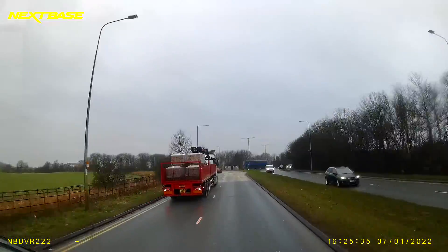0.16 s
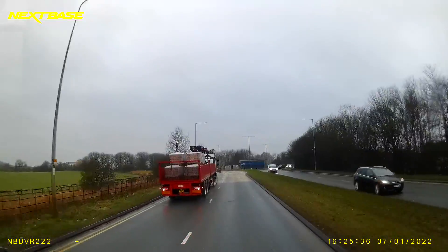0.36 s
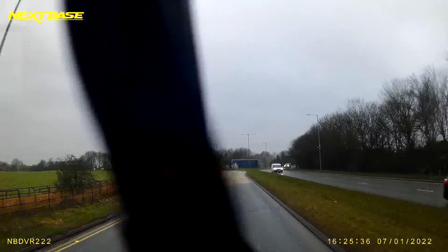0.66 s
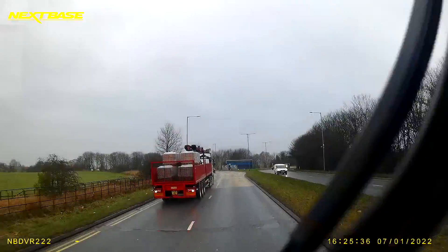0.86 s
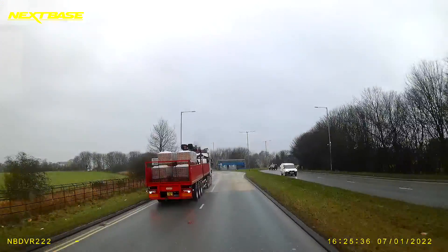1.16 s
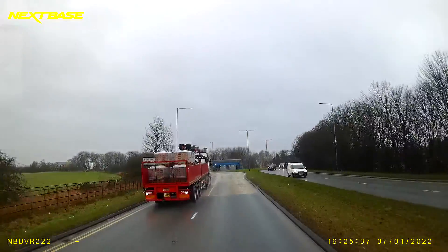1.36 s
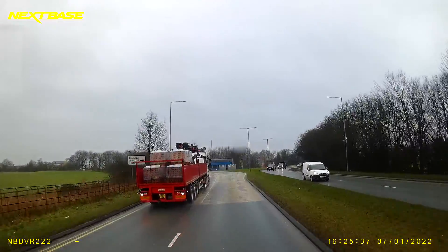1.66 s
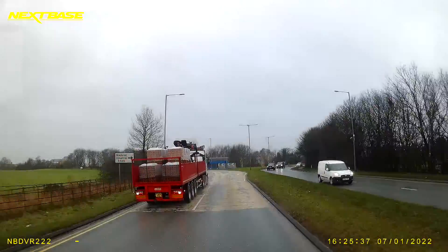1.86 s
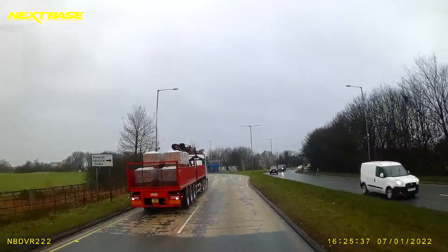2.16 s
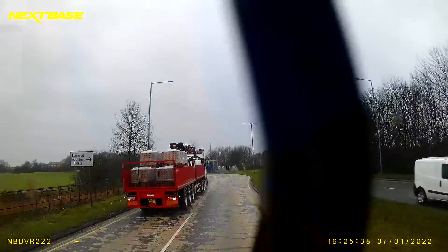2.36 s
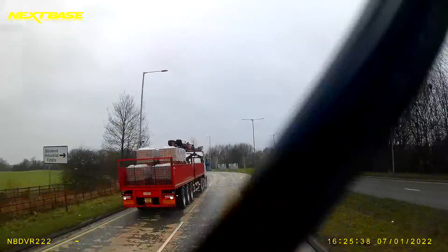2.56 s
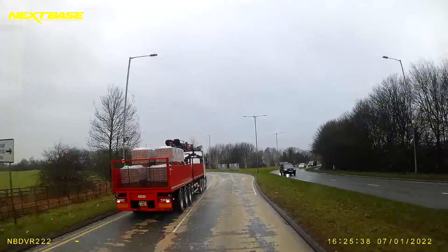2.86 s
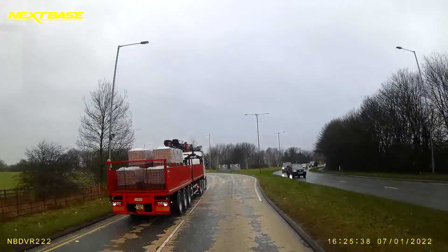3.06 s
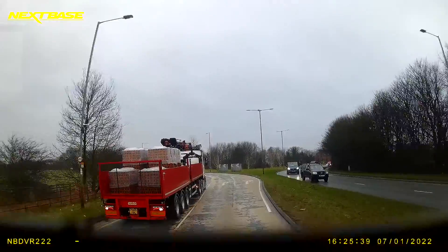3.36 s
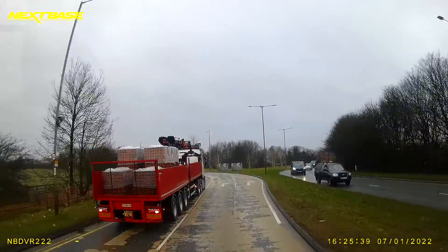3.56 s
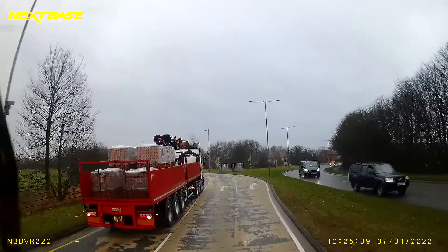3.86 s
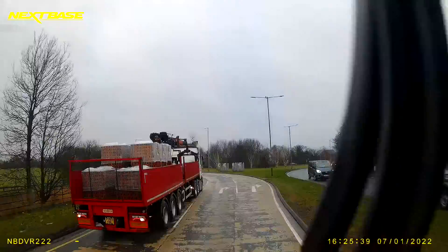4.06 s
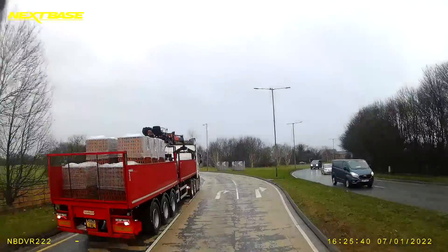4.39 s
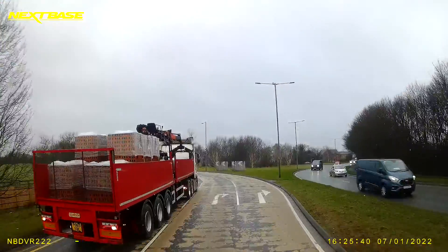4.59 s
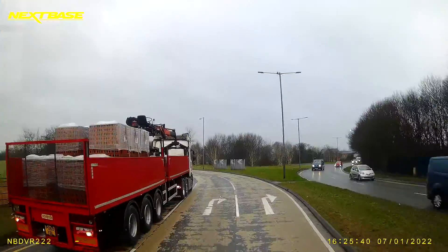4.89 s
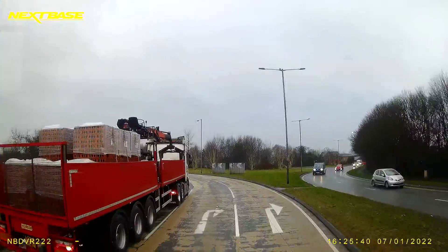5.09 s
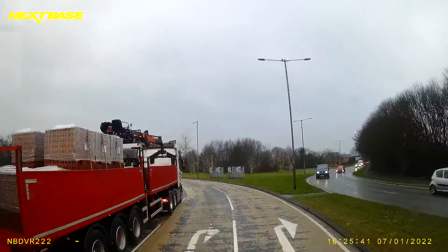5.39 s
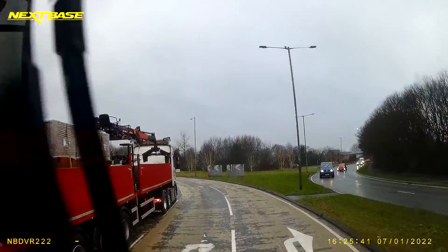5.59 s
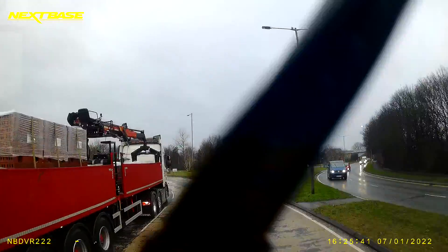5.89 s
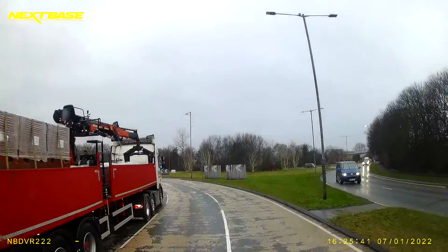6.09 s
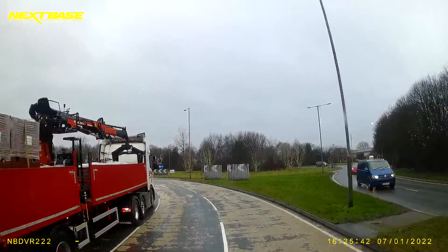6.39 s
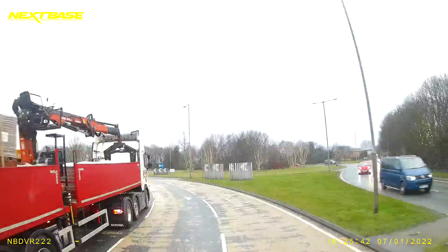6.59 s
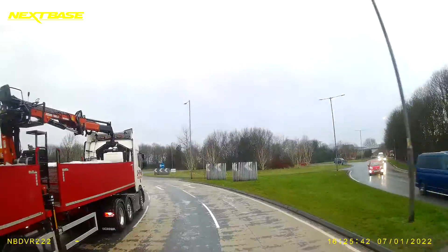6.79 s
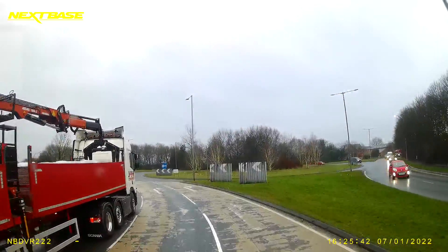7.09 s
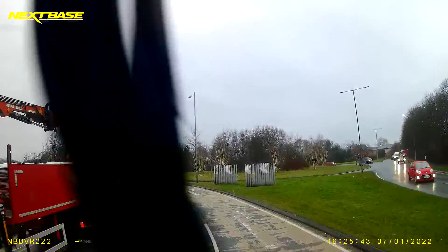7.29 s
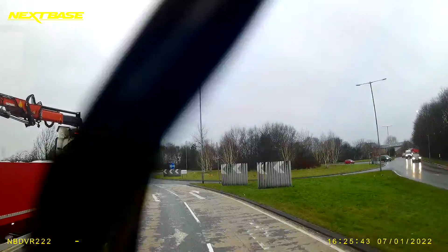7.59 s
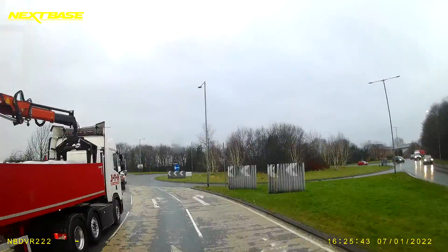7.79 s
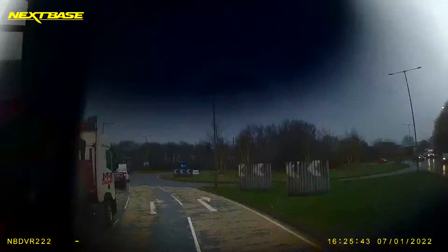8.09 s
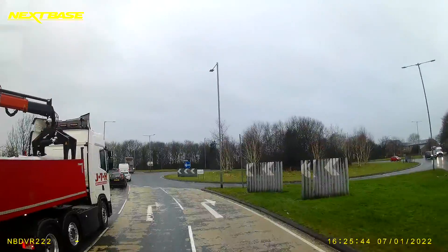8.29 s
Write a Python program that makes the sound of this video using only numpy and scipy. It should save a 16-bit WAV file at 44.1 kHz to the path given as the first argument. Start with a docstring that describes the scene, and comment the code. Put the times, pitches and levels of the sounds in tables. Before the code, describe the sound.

Close, dull interior sound of a lorry cab on a wet road: a wavering diesel drone around 70 Hz, deep tyre rumble, roar and watery swish, with a blur of oncoming traffic throughout. Wipers give quick groups of rubbery knocks ending in a hard slap and a small slip, at about 1.2-1.4, 2.8-3.1, 4.4-4.7, 6.1-6.4 and 7.8-8.1 seconds; soft arm thuds come about 0.3 seconds before each group, with wet rubbing between. From 1.6 to 2.2 the wheels hit joints: heavy thumps, floor booms, dashboard clatter and ticks. A faint tread hum sinks around 1-4. From 4 to 6 tyres thud over patches, most clearly near 5.4, while panels drone and light spray hisses from the lorry alongside. Faint breathy blade squeaks come near 2.8 and 5.9. A short rattling jolt follows at 7.1, a last bump at 8.3, with the engine drone rising at the end.

```python
"""Inside a lorry cab rolling along a wet road with the wipers on. Shaped noise makes the tyre rumble, roar and
swish, passing traffic and spray; wavering tones make the diesel drone. On each sweep the blade judders in
knocks that ring the modes of the windscreen; it also rubs and sings, and the arms turn with a soft thud.
Joints, dips and patches in the road bring thumps and booms, the lorry alongside drones as it draws level, and
the panels, dashboard and loose fittings boom, clatter, tick and chatter."""
import sys
import numpy as np
from scipy import signal
from scipy.fft import rfft, irfft
from scipy.io import wavfile
from scipy.ndimage import uniform_filter1d

SR = 44100
rng = np.random.default_rng(int(sys.argv[2]) if len(sys.argv) > 2 else 0)


def output_pcm(signal):
    """Save a mono or channel-first signal as 16-bit PCM at the path in sys.argv[1].

    Samples are clipped to [-1, 1] before scaling.
    """
    pcm = np.clip(np.atleast_2d(signal).T, -1, 1) * 32767
    wavfile.write(sys.argv[1], SR, np.round(pcm).astype(np.int16))


N = 372644
TIME = np.arange(N) / SR


def gain_of(db):
    """Turns decibels into amplitude."""
    return 10 ** (np.asarray(db) / 20)


def evened(x):
    """Scales a sound to rms 1."""
    return x / np.sqrt(np.mean(x ** 2) + 1e-20)


def read(points, hz):
    """Reads a spectrum in dB, joined by lines on a log-frequency axis and cut away beyond its ends."""
    point_hz, db = np.transpose(points)
    return np.interp(np.log(hz + 1), np.log(point_hz + 1), db, left=-100, right=-100)


def curve(rows, axis):
    """Joins one column of a time table by lines, giving a value at every sample."""
    rows = np.array(rows)
    return np.interp(TIME, rows[:, 0], rows[:, axis])


def add(mix, s, sound):
    """Lays a sound into the mix at time s, in seconds."""
    part = mix[round(s * SR):][:len(sound)]
    part += sound[:len(part)]


def coloured(x, spectrum):
    """Filters a sound to a given colour and scales it to rms 1."""
    hz = np.fft.rfftfreq(N, 1 / SR)
    return evened(irfft(rfft(x) * gain_of(read(spectrum, hz)), N))


def noise(spectrum):
    """Steady noise of a given colour, rms 1."""
    return coloured(rng.standard_normal(N), spectrum)


def drift(hz):
    """Slow random wandering, mostly below the given rate, rms 1."""
    f = np.fft.rfftfreq(N, 1 / SR)
    slow = (f > 0) / (1 + (f / hz) ** 4)
    return evened(irfft(rfft(rng.standard_normal(N)) * slow, N))


def steadied(x, span):
    """Takes the swells longer than span seconds out of a sound."""
    power = abs(uniform_filter1d(x ** 2, int(span * SR)))
    return x / np.sqrt(power + 0.00092)


def hump(rows):
    """An envelope that rises and falls smoothly once for each row (middle s, length s, dB)."""
    return sum(gain_of(db) * np.cos(np.pi * np.clip((TIME - s) / length, -.5, .5)) ** 2
               for s, length, db in rows)


def swells(rows, spectrum):
    """A flickering noise that rises and falls smoothly once for each row."""
    return hump(rows) * noise(spectrum) * gain_of(1.0 * drift(hz=50))


def blows(rows, rise, t60):
    """An envelope that swells with time constant rise and dies by 60 dB in t60 after each row (s, dB)."""
    envelope, t = np.zeros(N), np.arange(2 * SR) / SR
    shape = (1 - np.exp(-t / rise)) * gain_of(-60 * t / t60)
    for s, db in rows:
        add(envelope, s, gain_of(db) * shape / shape.max())
    return envelope


def bursts(rows, spectrum, rise, t60):
    """Each blow stirs many close, well damped modes: a noise that swells and dies."""
    return blows(rows, rise, t60) * steadied(noise(spectrum), span=0.042)


def patchy(spectrum, patch_db, count=12):
    """A noise whose narrow bands surge and sink, each by itself."""
    colour, hz = rfft(noise(spectrum)), np.fft.rfftfreq(N, 1 / SR)
    place = np.interp(np.log(hz + 1), np.log([300, 4000]), [0, count - 1])
    knots = np.arange(0, N / SR + 1, 1 / 20)
    total = np.zeros(N)
    for k in range(count):
        surge = np.interp(TIME, knots + rng.random() / 20, rng.standard_normal(len(knots)))
        band = irfft(colour * np.maximum(1 - abs(place - k), 0), N)
        total += band * gain_of(patch_db * surge)
    return evened(total)


def cab(x, t60, wet_db):
    """The small padded cab adds a short tail of dense reflections."""
    t = np.arange(SR // 4) / SR
    struck = rng.random(len(t)) < 2500 / SR  # about 2500 reflections a second
    taps = rng.standard_normal(len(t)) * struck * (t > .005) * gain_of(-60 * t / t60)
    return x + gain_of(wet_db) * signal.oaconvolve(x, taps / np.linalg.norm(taps))[:N]


# The cab rocks on its mounts after a joint or a dip.
# Each row: start in seconds, sway level in dB, level of the drumming floor in dB.
ROCKS = [(1.64, -26.5, -32), (2.05, -31.5, -38), (5.3, -33, -40), (6.55, -34.5, -51), (7.05, -27.5, -56)]
# How coarse the road is. Each row: time in seconds, rumble level in dB.
SURFACE = [(0, -43), (1.3, -41), (2.3, -37.5), (2.8, -44), (3.4, -37.5), (4.6, -40.5), (5.9, -35),
           (6.5, -37.5), (7.55, -34), (7.85, -41.5), (8.45, -42.5)]
# Tyre roar as the speed and the road change. Each row: time in seconds, level in dB before it wavers.
TYRES = [(0, -37), (1.2, -37), (2, -37.5), (3, -37), (3.7, -38.5), (4.6, -38), (5.8, -37.5), (6.7, -38.5),
         (7.5, -38), (8.45, -39.5)]
# Water on the road. Each row: time in seconds, swish level in dB before it wavers.
WATER = [(0, -44.5), (1.5, -44.5), (2.1, -43.5), (2.5, -43.5), (2.9, -44.5), (3.5, -46.5), (4.1, -46.5),
         (5.4, -43.5), (6.1, -41.5), (6.5, -46.5), (7.4, -45), (8.45, -46)]
# Colours of the sway, rumble, roar and swish. Each row: frequency in Hz, relative strength in dB per Hz.
SWAY = [(6, -36), (13, -16), (18, 8.5), (21.5, 3), (27, -25), (80, -76)]
RUMBLE = [(15, -42), (30, -9.5), (42, 3.5), (55, -12.5), (70, -1.5), (82, -6.5), (104, 2), (122, 1.5),
          (145, -7), (200, -17.5), (500, -47)]
ROAR = [(80, -26), (150, -2.5), (200, 0.5), (230, -1.5), (275, 1.5), (330, -1.5), (370, -3.5), (450, -5.5),
        (530, -6), (660, -15), (770, -13), (1100, -62), (2000, -55)]
SWISH = [(250, 5.5), (500, 1.5), (680, -3), (780, 4), (840, 3), (1020, 0.5), (1250, -5.5), (1600, -14.5),
         (1900, -14), (2100, -13.5), (2350, -19.5), (2750, -21), (3500, -28), (4200, -30.5), (6500, -44.5)]
ROCK_RISE_S, ROCK_T60_S = 0.14, 1.04
SWAY_DB = -43.5  # on an even road
SHAKE_DB = -11  # extra roar while the floor drums, relative to the drumming


def road():
    """The cab sways and drums; the tyres roar over an uneven surface and throw up water."""
    rocking = blows([(s, db) for s, db, _ in ROCKS], ROCK_RISE_S, ROCK_T60_S)
    drumming = blows([(s, db) for s, _, db in ROCKS], ROCK_RISE_S, ROCK_T60_S)
    sway = steadied(noise(SWAY), span=0.07) * np.hypot(gain_of(SWAY_DB), rocking)
    rumble_level = np.hypot(gain_of(curve(SURFACE, axis=1)), drumming)
    rumble = steadied(noise(RUMBLE), span=0.18) * rumble_level
    unevenness = drift(hz=4.4)
    roar_level = np.hypot(gain_of(curve(TYRES, axis=1) + 1.0 * unevenness), gain_of(SHAKE_DB) * drumming)
    roar = steadied(noise(ROAR), span=0.091) * roar_level
    swish_db = curve(WATER, axis=1) + .5 * unevenness + .5 * drift(hz=40)
    swish = patchy(SWISH, patch_db=1.0) * gain_of(swish_db)
    return sway + rumble + roar + swish


# The diesel. Each row: time in seconds, firing rate in Hz before it wobbles, level in dB.
ENGINE = [(0, 71.4, -44), (2.2, 71.84, -45), (3.2, 69.94, -46), (4.3, 71.14, -46), (5.3, 69.24, -46),
          (6.3, 68.84, -44), (7.3, 70.2, -50), (8.45, 69.9, -36.5)]
# The tones of its drone. Each row: multiple of the firing rate, relative strength in dB before it wavers.
ORDERS = [(1, 0), (1.6, -6.5), (5 / 3, -9), (3, -20), (4, -11)]


def engine():
    """Low orders of the diesel come through the floor, each wavering in strength."""
    firing_hz = curve(ENGINE, axis=1) * (1 + 0.01455 * drift(hz=6.3))
    turns = np.cumsum(firing_hz) / SR
    drone = np.zeros(N)
    for multiple, db in ORDERS:
        tone = np.sin(2 * np.pi * (multiple * turns + rng.random()))
        drone += gain_of(db + 3.2 * drift(hz=5.4)) * tone
    return gain_of(curve(ENGINE, axis=2)) * evened(drone)


# Oncoming traffic on the wet road. Each row: middle in seconds, length in seconds, level in dB.
PASSES = [(.25, 11.7, -46.5), (2.35, 1.6, -71), (4.0, 0.41, -66), (4.8, 1, -55)]
# Colour of the traffic. Each row: frequency in Hz, relative strength in dB per Hz.
TRAFFIC = [(380, -2), (450, -5), (530, 7), (620, 6.5), (700, -2), (790, -13), (900, 6), (1100, -13.5),
           (1400, -37), (2000, -34), (4000, -59)]


def oncoming_traffic():
    """Oncoming traffic goes by as noise that swells and fades."""
    return swells(PASSES, TRAFFIC)


# Wet rubber rubs over the glass. Each row: middle of the stroke in seconds, length in seconds, level in dB.
RUBS = [(1.0, 0.89, -43), (2.85, 0.83, -44), (4.5, 0.5, -52), (5.97, 0.51, -48.5), (7.62, .3, -51)]
# Colour of the rubbing. Each row: frequency in Hz, relative strength in dB per Hz.
RUBBER = [(500, -16), (850, 0), (1030, 5), (1200, -5.5), (1550, -20), (1900, -22.5), (2120, -16),
          (2400, -23.5), (4000, -34.5), (7000, -42)]


def rubbing():
    """The wet rubber hisses over the glass, loudest in the middle of each stroke."""
    return swells(RUBS, RUBBER)


# Dips in the road. Each row: middle in seconds, length in seconds, level in dB.
DIPS = [(.85, 0.17, -35.5), (1.7, 0.18, -37), (1.98, 0.67, -34), (5.8, 0.27, -37), (6.22, 0.61, -39.5),
        (7.14, 0.13, -32.5)]
# Colour of the floor boom. Each row: frequency in Hz, relative strength in dB per Hz.
FLOOR_BOOM = [(25, -27), (45, -12), (58, -2), (70, 0), (85, 0), (110, -12), (160, -34)]


def floor_booms():
    """The cab floor booms over dips in the road: low noise that swells and fades."""
    return hump(DIPS) * steadied(noise(FLOOR_BOOM), span=0.042)


# The wiper arms reverse. Each row: start in seconds, level in dB.
TURNS = [(.83, -33), (2.5, -32), (4.14, -33.5), (5.77, -29), (7.45, -46)]
# Colour of the thud. Each row: frequency in Hz, relative strength in dB per Hz.
THUD = [(15, -15), (42, -12), (60, -9), (90, 3), (120, -17.5), (170, -7), (400, -57), (900, -27)]


def arm_turns():
    """The arms turn round with a soft thud, a short burst of low noise."""
    return bursts(TURNS, THUD, rise=0.0086, t60=0.18)


# The suspension knocks. Each row: start in seconds, peak level in dB before the treble is softened.
THUMPS = [(.883, -35), (1.646, -21), (1.769, -26), (1.861, -25), (1.887, -18), (1.939, -25), (2.022, -25),
          (2.046, -19), (5.28, -29), (7.468, -24), (7.654, -28), (8.286, -22.5)]
THUMP_HZ, THUMP_T60_S = 149, 0.01  # the pitch is the middle of a random spread


def suspension():
    """Each knock is one low, heavily damped push on the cab floor."""
    t, out = np.arange(SR // 10) / SR, np.zeros(N)
    for s, db in THUMPS:
        hz = THUMP_HZ * (1 + 0.14 * rng.standard_normal())
        push = np.sin(2 * np.pi * hz * t) * gain_of(-60 * t / THUMP_T60_S)
        add(out, s, gain_of(db) * push / push.max())
    return signal.sosfilt(signal.butter(2, 700, fs=SR, output="sos"), out)


# The tread hums over one coarse stretch. Its row: middle in seconds, length in seconds, level in dB.
TREAD_STRETCH = [(2.6, 3, -42.5)]
TREAD_HZ, TREAD_SAG_HZ_PER_S = 195.5, 4  # pitch at the middle of the stretch, and its fall


def tread():
    """A broken, wavering hum that sinks as the lorry slows."""
    hz = TREAD_HZ - TREAD_SAG_HZ_PER_S * (TIME - TREAD_STRETCH[0][0])
    angle = 2 * np.pi * np.cumsum(hz) / SR
    hum = drift(hz=11) * np.cos(angle) + drift(hz=11) * np.sin(angle)
    return hump(TREAD_STRETCH) * steadied(hum, span=.4)


# The blade judders in knocks. Each row: start in seconds, level in dB, level of the rasp in dB.
KNOCKS = [(1.1615, -30.5, -50), (1.237, -28.5, -49), (2.756, -34, -49), (2.834, -31, -47.5),
          (2.9118, -30, -49), (4.419, -33.5, -47.5), (4.501, -29, -48), (4.58, -27.5, -48),
          (6.072, -34.5, -47), (6.15, -33, -48), (6.228, -28.5, -45), (7.811, -32, -53),
          (7.8901, -29.5, -50)]
# Each judder ends in a hard slap and a parting slip.
# Each row: slap in seconds, its level in dB, parting slip in seconds, its level in dB.
SLAPS = [(1.319, -29, 1.41, -33.5), (2.9921, -29.5, 3.0936, -35.5), (4.659, -29, 4.7475, -38.5),
         (6.3058, -28.5, 6.399, -35.5), (7.971, -28.5, 8.06, -34)]
# How the rubber meets the glass in a knock, a slap and a parting slip. Each holds: lead in seconds,
# treble limit in Hz before a small chance shift, spread of the bending waves in seconds,
# rebound delay in seconds and its strength against the landing (a ratio), settling delay in seconds
# and its ratio (both delays before a small chance shift), treble limit of rebound and settling in Hz.
KNOCK = (.0017, 930, .0009, .00431, 2.3, .01235, -.5, 900)
SLAP = (-.0002, 1210, .0002, .00556, .63, .0093, .85, 1010)
PARTING = (-.0005, 1100, .0005, .00269, .34, .01057, .55, 1370)


def slips():
    """Stick and slip: knocks lead up to a hard slap, then a late slip frees the blade. Yields (s, dB, touch)."""
    for s, db, _ in KNOCKS:
        yield s, db, KNOCK
    for slap_s, slap_db, parting_s, parting_db in SLAPS:
        yield slap_s, slap_db, SLAP
        yield parting_s, parting_db, PARTING


def slip(touch, size=4096):
    """The blade lands, rebounds and settles; bending waves carry it through the glass, treble first."""
    lead_s, limit_hz, spread_s, rebound_s, rebound, settle_s, settle, dull_hz = touch
    hz = np.fft.rfftfreq(size, 1 / SR)
    rebound_shift, settle_shift, limit_shift = rng.standard_normal(3)

    def delayed(s):
        """A delay of s seconds, as a turn of phase."""
        return np.exp(-2j * np.pi * hz * s)

    later = rebound * delayed(rebound_s * (1 + .015 * rebound_shift))
    later = later + settle * delayed(settle_s * (1 + .01 * settle_shift))
    contacts = 1 + later / np.sqrt(1 + (hz / dull_hz) ** 4)
    soft_rubber = 1 / np.sqrt(1 + (hz / (limit_hz * (1 + .03 * limit_shift))) ** 8)
    # the delay falls as 1 / sqrt(f), which rounds the attack; it is nil at 3000 Hz
    bending = np.exp(-2j * np.pi * spread_s * (2 * np.sqrt(1000 * hz) - hz * np.sqrt(1000 / 3000)))
    # the stiff pane radiates hardly any bass
    pane = 1 / np.sqrt(1 + (320 / (hz + 1)) ** 12)
    # 10 ms of room at the front, taken back when the knock is laid in
    landing = delayed(1 / 100 - lead_s)
    return irfft(contacts * soft_rubber * bending * pane * landing, size)[:size // 2]


# Ringing modes of the windscreen. Each row: middle pitch in Hz, middle relative strength in dB,
# time to fall by 60 dB in seconds.
SCREEN = [(290, -18, 0.11), (436, -5.5, 0.15), (555, 3, 0.06), (629.5, 12.5, 0.037), (684, -11, 0.17),
          (764, 5, 0.067), (900, -29, 0.056), (1033, 4, 0.036), (1227, 5.5, 0.014), (1390, -0.5, 0.04),
          (1834, 12, 0.012), (2090, 9.5, 0.046), (2230, 3, 0.035), (2530, 13, 0.04), (2770, 11, 0.035)]


def judder():
    """Every slip of the blade rings the windscreen, with small chance shifts in pitch and strength."""
    t, out = np.arange(SR // 6) / SR, np.zeros(N)
    hz, mode_db, t60 = np.transpose(SCREEN)[:, :, None]
    for s, db, touch in slips():
        detune, strength_db = rng.standard_normal((2, len(SCREEN), 1))
        pitch = hz * (1 + .006 * detune)
        glass = gain_of(mode_db + strength_db - 60 * t / t60) * np.sin(2 * np.pi * pitch * t)
        knock = signal.fftconvolve(slip(touch), glass.sum(0))
        loudness = knock[SR // 200:][:SR // 40].std()  # over 25 ms around the knock
        add(out, s - 1 / 100, gain_of(db) * knock / loudness)
    return cab(out, t60=0.11, wet_db=-12.5)


# Colours of the scrub, rasp and crack. Each row: frequency in Hz, relative strength in dB per Hz.
SCRUB = [(300, -11), (430, -6), (560, 16), (780, -10), (900, -7)]
RASP = [(700, -12), (1400, -1), (1850, 7), (2100, 6), (2400, -16), (4000, -25)]
CRACK = [(700, 8), (1300, -1), (1700, -3), (2200, -10), (2900, -3.5), (3400, -15), (4500, -28)]
SCRUB_DB, CRACK_DB = -8, -17.5  # relative to the slip


def rubber():
    """The rough edge of the blade scrubs at every slip, rasps at each knock and cracks at the slap."""
    scrub = bursts([(s, db) for s, db, _ in slips()], SCRUB, rise=0.0065, t60=0.062)
    rasp = bursts([(s, db) for s, _, db in KNOCKS], RASP, rise=0.0012, t60=0.063)
    crack = bursts([(s, db) for s, db, _, _ in SLAPS], CRACK, rise=.0006, t60=.045)
    return gain_of(SCRUB_DB) * scrub + rasp + gain_of(CRACK_DB) * crack


# Cab panels boom. Each row: middle in seconds, length in seconds, level in dB, pitch in Hz before it wobbles.
BOOMS = [(1.66, 0.12, -37.5, 515), (4.31, 0.7, -46, 332), (4.95, 0.34, -47, 331), (5.847, 0.67, -39.5, 208),
         (6.26, 0.3, -41, 332.3), (6.894, 0.42, -46, 304.7), (7.594, 0.64, -43.5, 318.3)]


def panel_booms():
    """Each shaken panel sounds near one pitch, in uneven lumps."""
    out = np.zeros(N)
    for s, length, db, hz in BOOMS:
        turns = np.cumsum(hz * (1 + 0.0249 * drift(hz=11.85))) / SR
        lumpy = np.sin(2 * np.pi * turns) * gain_of(3.5 * drift(hz=17))
        out += hump([(s, length, db)]) * steadied(lumpy, span=0.27)
    return out


# The dashboard clatters after a jolt. Each row: start in seconds, level of the first bounce in dB.
CLATTERS = [(1.641, -43), (1.757, -40), (1.842, -36.5), (1.891, -44), (1.936, -39), (2.184, -42),
            (2.317, -47), (7.087, -38), (7.184, -40)]
# Ringing modes of the dashboard. Each row: middle pitch in Hz, middle relative strength in dB,
# time to fall by 60 dB in seconds.
DASH = [(686, 7, 0.036), (782, 7, 0.046), (950, -0.5, 0.038), (1105, -8, 0.031), (1410, -16, 0.018),
        (2070, -10, 0.029), (2610, -18, 0.023), (2850, -16, 0.013), (4250, -22, 0.022)]
BOUNCE_S, BOUNCE_LOSS_DB = 0.012, 5.5  # average gap between bounces, and loss at each


def clatter(count=4):
    """A loose dashboard panel bounces a few times, weaker each time, and rings its modes."""
    t, out = np.arange(SR // 12) / SR, np.zeros(N)
    hz, mode_db, t60 = np.transpose(DASH)[:, :, None]
    for s, db in CLATTERS:
        for k in range(count):
            detune, strength, phase = rng.standard_normal((3, len(DASH), 1))
            pitch = hz * (1 + 0.027 * detune)
            fading = gain_of(mode_db + 2 * strength - 60 * t / t60)
            ring = (fading * np.sin(2 * np.pi * (pitch * t + phase))).sum(0)
            ring = ring * np.minimum(t / .0006, 1)  # soft attack
            add(out, s, gain_of(db - k * BOUNCE_LOSS_DB) * ring / ring[:SR // 100].std())
            s += BOUNCE_S * (.5 + rng.random())
    return cab(out, t60=0.096, wet_db=-2.5)


# Wheels strike joints in the road. Each row: start in seconds, level in dB.
BUMPS = [(1.646, -36), (1.755, -27), (1.84, -29), (1.936, -31), (2.03, -37), (2.135, -30), (7.083, -33.5),
         (7.18, -34), (8.28, -36)]
# Colour of the jolt. Each row: frequency in Hz, relative strength in dB per Hz.
JOLT = [(12, 1), (19, 15), (27, -5), (45, 12), (75, 3), (110, -18), (150, 4), (200, -3), (330, 1.5),
        (560, -2), (660, -8.5), (770, -2), (1100, -26), (1500, -27), (2700, -35), (5000, -61), (12000, -64)]


def joints():
    """Wheels strike joints in the road, and each shakes the cab as a burst of noise."""
    return bursts(BUMPS, JOLT, rise=0.0076, t60=0.21)


# Loose trim ticks. Each row: start in seconds, level in dB.
TICKS = [(1.742, -43), (1.78, -56), (4.865, -52), (7.077, -51)]
# Colour of the ticks. Each row: frequency in Hz, relative strength in dB per Hz.
TRIM = [(700, -10), (2000, 12), (4200, -2), (5500, -3), (7000, 0), (9000, -16), (15000, -22)]


def trim_ticks():
    """Loose trim ticks: very short bursts of bright noise."""
    return bursts(TICKS, TRIM, rise=.0003, t60=0.0086)


# Loose fittings chatter as the cab is shaken. Each row: middle in seconds, length in seconds, level in dB.
CHATTERS = [(1.855, .07, -66), (1.945, .04, -68), (7.088, 0.068, -58.5), (7.19, .12, -73),
            (7.34, 0.07, -69)]
# Colour of the clicks. Each row: frequency in Hz, relative strength in dB per Hz.
CHATTER = [(1200, 1), (2200, 6), (3500, 6.5), (5000, -2), (7000, -4), (10000, -12), (15000, -16)]
CHATTER_PER_S = 3000  # average clicks per second


def chatter():
    """Clusters of tiny clicks from loose fittings, at random moments."""
    clicks = rng.standard_normal(N) * (rng.random(N) < CHATTER_PER_S / SR)
    return hump(CHATTERS) * coloured(clicks, CHATTER)


# Patches in the tarmac. Each row: start in seconds, level in dB.
PATCHES = [(2.19, -40), (4.056, -38.5), (4.891, -40), (4.966, -38.5), (5.187, -35.5), (5.366, -31.5),
           (5.458, -31.5), (5.794, -39), (6.618, -40), (7.622, -40)]
# Colour of the thuds. Each row: frequency in Hz, relative strength in dB per Hz.
PATCH = [(180, -12), (300, 3), (420, 5), (560, 3.5), (780, 3), (1050, -6), (1300, -15.5), (1600, -24.5),
         (2100, -21.5), (2700, -29), (4500, -37)]


def patch_thuds():
    """The tyres thud over patches in the tarmac, each a short burst of noise."""
    return bursts(PATCHES, PATCH, rise=0.0036, t60=0.085)


# The blade sings on the glass. Each row: middle in seconds, length in seconds, level in dB, pitch in Hz.
SINGS = [(2.84, .3, -62, 2140), (5.83, .26, -60, 2090), (6.015, 0.28, -59, 2170)]
SING_HALF_WIDTH_HZ = 57


def singing():
    """The blade sings for a moment: a breathy, narrow whistle."""
    out = np.zeros(N)
    for s, length, db, hz in SINGS:
        angle = 2 * np.pi * hz * TIME
        whistle = drift(SING_HALF_WIDTH_HZ) * np.cos(angle) + drift(SING_HALF_WIDTH_HZ) * np.sin(angle)
        out += hump([(s, length, db)]) * evened(whistle)
    return out


# Water sprays up from the lorry alongside. Each row: middle in seconds, length in seconds, level in dB.
SPRAYS = [(4.6, 0.96, -63), (5.38, 0.87, -59), (6.0, 1, -65), (7.33, 0.9, -63)]
# The engine of the lorry alongside drones as it draws level. Each row: middle in seconds, length in seconds,
# level in dB.
DRONES = [(5.15, 1.1, -37.5), (5.85, 0.57, -43), (6.8, 1.1, -44)]
# Colours of the spray and the engine drone. Each row: frequency in Hz, relative strength in dB per Hz.
SPRAY = [(700, -16), (1500, 2), (2100, 6.5), (2700, 3), (3400, -7), (4300, -3), (5300, -15), (7000, -16),
         (12000, -26)]
OTHER_ENGINE = [(170, -6), (208, 3.5), (235, -8), (275, 3), (310, 2.5), (340, -1), (385, -3.5), (450, -4),
                (700, -52), (775, 1), (850, -75)]


def other_lorry():
    """The lorry in the next lane throws gusts of spray, and its engine drones as it draws level."""
    return hump(SPRAYS) * patchy(SPRAY, patch_db=1.5) + swells(DRONES, OTHER_ENGINE)


def scene():
    """Road, engine, traffic, wipers and the jolts of the cab."""
    traffic = oncoming_traffic() + other_lorry()
    wipers = rubbing() + arm_turns() + judder() + rubber() + singing()
    jolts = floor_booms() + suspension() + joints() + patch_thuds()
    fittings = panel_booms() + clatter() + trim_ticks() + chatter()
    return (road() + engine() + tread() + traffic + wipers + jolts + fittings)[None]


# Colour of the microphone hiss. Each row: frequency in Hz, relative strength in dB per Hz.
HISS = [(500, 0.76), (4000, 1.5), (7000, 0.45), (10000, -0.43), (16000, -0.54)]
EDGE_HZ = 15640  # top of the band


def record(dry):
    """The small microphone adds its own hiss; then a soft start and the band limit."""
    soft_start = np.sin(np.pi / 2 * np.minimum(TIME * 500, 1)) ** 2  # 2 ms
    heard = (dry + gain_of(-69.5) * noise(HISS)) * soft_start
    band = signal.firwin(1023, EDGE_HZ, window=("kaiser", 9), fs=SR)
    return signal.oaconvolve(heard, band[None], "same")


dry = scene()
out = record(dry)
output_pcm(out)
```